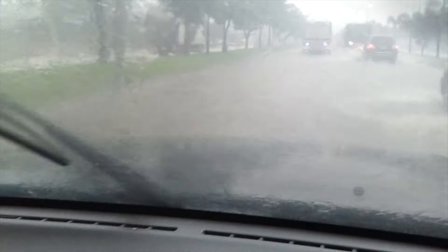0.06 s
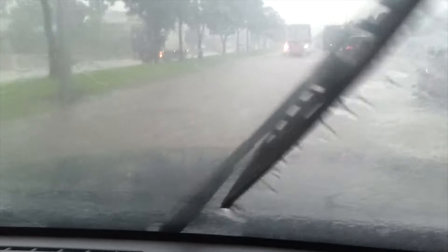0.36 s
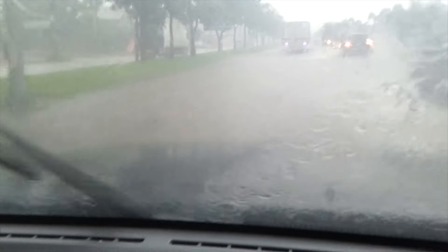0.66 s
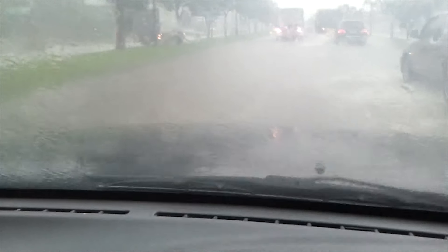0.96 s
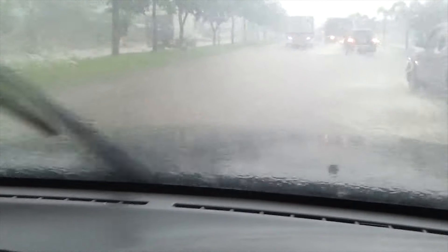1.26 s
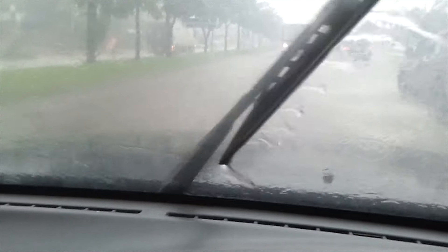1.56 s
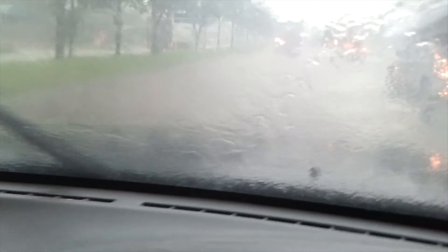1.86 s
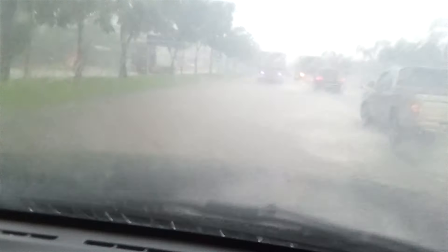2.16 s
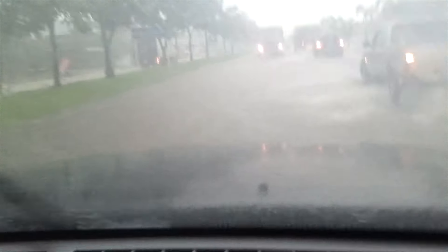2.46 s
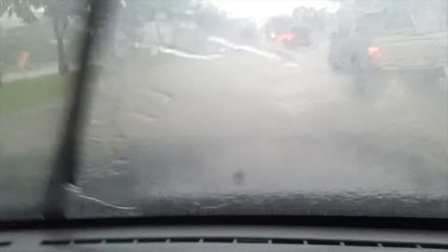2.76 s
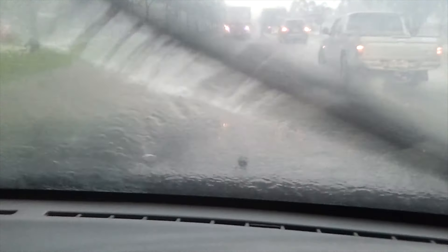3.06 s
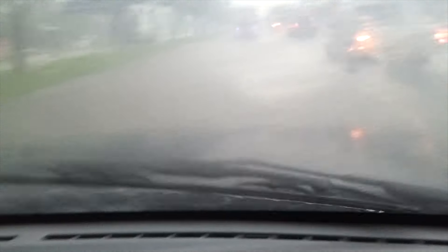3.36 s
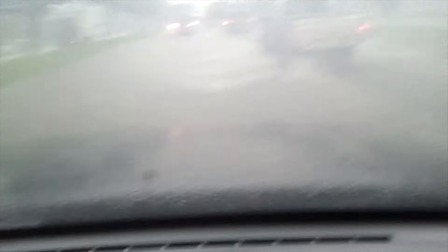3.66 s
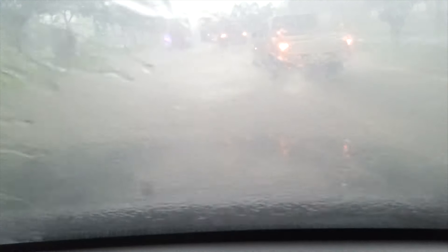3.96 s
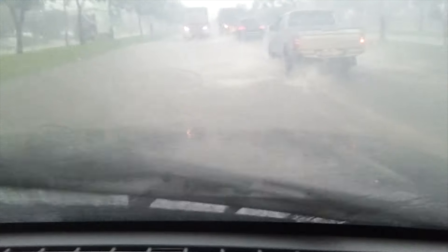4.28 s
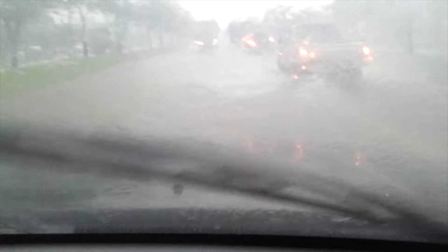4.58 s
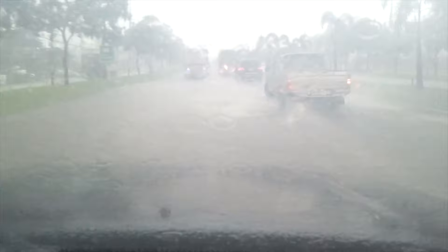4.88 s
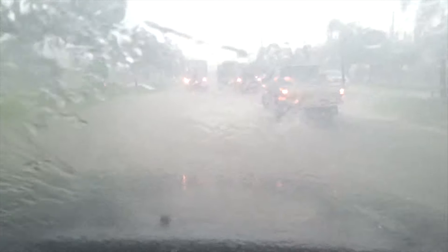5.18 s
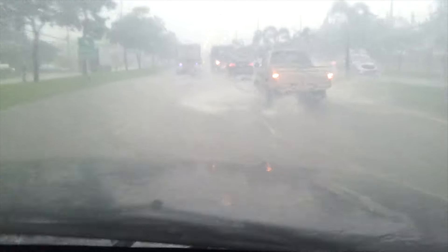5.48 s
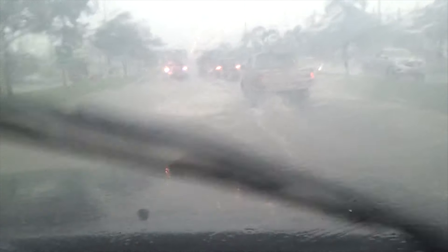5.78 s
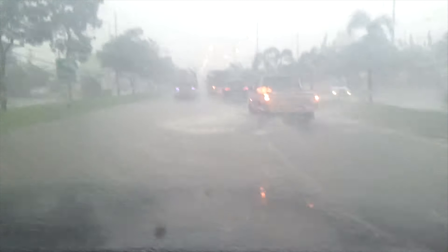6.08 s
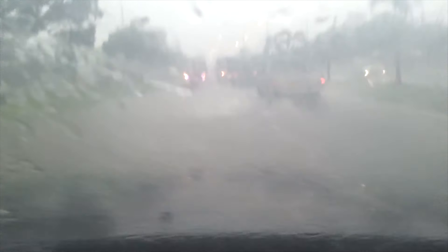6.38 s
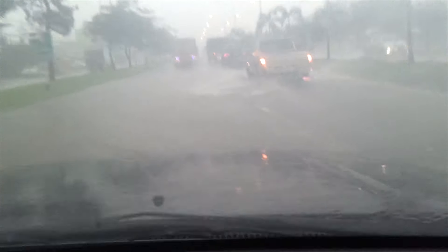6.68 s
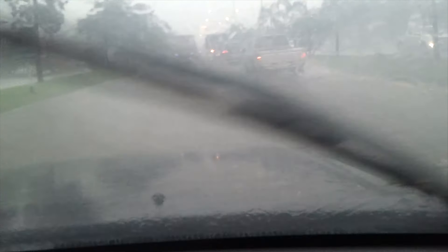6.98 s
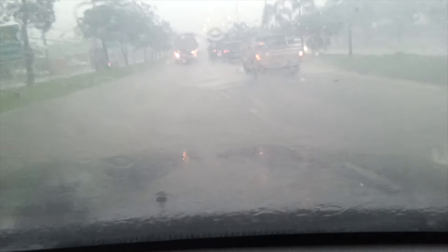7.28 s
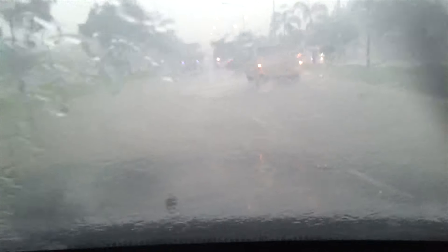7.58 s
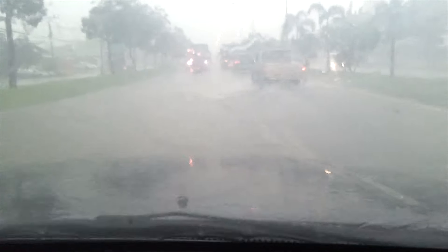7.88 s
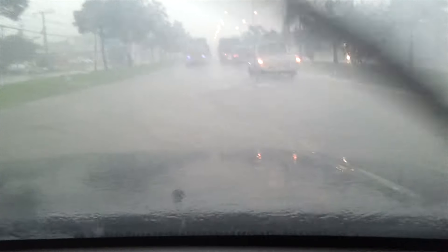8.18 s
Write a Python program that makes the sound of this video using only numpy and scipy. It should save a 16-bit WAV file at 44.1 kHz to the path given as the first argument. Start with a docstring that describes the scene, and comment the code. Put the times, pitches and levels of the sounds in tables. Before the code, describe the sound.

Heavy rain drums on a car roof and ticks on the windscreen, heard from inside the cabin. A deep, steady engine boom and road rumble run underneath, with dull bumps and soft, regular wiper thuds. Water breaks on the glass twice, then halfway through the tyres spray and splash through a puddle. The boom slightly overloads the microphone.

```python
"""Heavy rain on a slowly driven car, heard in the cabin. From the start the engine booms over the road
rumble, drops patter on the roof and tick on the windscreen, and the tyres throw water. From 0.7 s come
dull thumps and bumps; from 1.3 s the wipers thud at the end of each sweep. Water breaks on the glass
near 2 s and 3 s; from 4 s the tyres spray and splash through a puddle. Throughout, crests of the boom
overload the microphone and briefly choke the rain."""
import sys
import numpy as np
from scipy import signal
from scipy.fft import rfft, irfft
from scipy.io import wavfile
from scipy.ndimage import uniform_filter1d

SR = 44100
rng = np.random.default_rng(int(sys.argv[2]) if len(sys.argv) > 2 else 0)


def generate_wav(signal):
    """Clip the signal to [-1, 1] and save it as 16-bit WAV at the path in sys.argv[1]."""
    frames = np.transpose(np.atleast_2d(signal))
    scaled = np.clip(frames, -1, 1) * 32767
    pcm = np.round(scaled).astype(np.int16)
    wavfile.write(sys.argv[1], SR, pcm)


N = 372204
TIME = np.arange(N) / SR


def undb(db):
    """Decibels to gain."""
    return 10 ** (np.asarray(db) / 20)


def unit(x):
    """Scale to rms 1."""
    return x / np.sqrt(np.mean(x ** 2))


def curves(table):
    """Table columns, interpolated linearly in time."""
    times, *columns = np.transpose(table)
    return [np.interp(TIME, times, column) for column in columns]


def colour(x, points, size=8192):
    """Minimum-phase filter through (frequency [Hz], gain [dB]) points."""
    hz, db = np.transpose(points)
    bins_hz = np.maximum(np.arange(size // 2 + 1) * SR / size, 1)
    gain = undb(np.interp(np.log(bins_hz), np.log(hz), db))
    cepstrum = irfft(np.log(gain))
    cepstrum[1:size // 2] *= 2
    cepstrum[size // 2 + 1:] = 0
    impulse_response = irfft(np.exp(rfft(cepstrum)))
    return signal.fftconvolve(x, impulse_response)[:N]


def walk(rate_hz):
    """Random steps, smoothed twice; rms 1."""
    hold = int(SR / rate_hz)
    steps = rng.standard_normal(N)[np.arange(N) // hold]
    return unit(uniform_filter1d(uniform_filter1d(steps, hold), hold))


def pulse(centre_s, half_s):
    """Gaussian envelope, 1/e at half_s from the centre."""
    return np.exp(-((TIME - centre_s) / half_s) ** 2)


def decays(table, t60_s):
    """Envelope that jumps at each (time [s], level [dB]) and dies away."""
    kicks = np.zeros(N)
    for s, db in table:
        kicks[int(s * SR)] += undb(db)
    return signal.lfilter([1], [1, -np.exp(-np.log(1000) / (t60_s * SR))], kicks)


def shower(per_s, spread_db, cap_db=np.inf):
    """Randomly timed impacts, levels exponentially distributed in dB."""
    size_db = np.minimum(spread_db * rng.exponential(size=N), cap_db)
    return (rng.random(N) < per_s / SR) * undb(size_db) * rng.choice([-1, 1], N)


def splash(hits, t60_s, spray_db):
    """Each impact bursts into fast-decaying droplets."""
    pole = undb(-60 / (t60_s * SR)) ** 2
    energy = signal.lfilter([1 - pole], [1, -pole], hits ** 2)
    return hits + undb(spray_db) * np.sqrt(energy) * rng.standard_normal(N)


# (time [s], firing rate [Hz])
FIRING_RATE = [(0, 34.34), (0.8, 34.88), (1.7, 35.23), (2.6, 34.99), (3.4, 34.51), (4.3, 34.3), (5, 33.79),
               (6.2, 33.68), (7, 34.15), (7.7, 33.78), (8.44, 34.27)]
# (time [s], level [dB])
BOOM_LEVEL = [(0, -4), (.33, -4.5), (.8, -3.5), (1.13, -4), (1.3, -1.5), (1.6, -5.5), (2, -4.5), (2.25, -7),
              (2.52, -3.5), (2.98, -4.5), (3.2, -5.5), (3.65, -3.5), (3.87, -4.5), (4.45, -3), (4.68, -5),
              (4.92, -4.5), (5.1, -3.5), (5.33, -4), (5.52, -2.5), (5.72, -2.5), (6.05, -4.5), (6.55, -4.5),
              (6.7, -1.3), (7.15, -4), (7.45, -6), (7.9, -5.5), (8.1, -2.5), (8.44, -3.5)]
# (multiple of firing rate, level off resonance [dB re boom])
OVERTONES = [(2, -28), (3, -30.5), (4, -38)]


def engine(gain_db, waver, mode_hz, mode_width_hz, mode_db):
    """Firing drives the cabin air: a near sine whose weak overtones swell near the lengthwise mode."""
    firing_hz, = curves(FIRING_RATE)
    boom_db, = curves(BOOM_LEVEL)
    phase = 2 * np.pi * np.cumsum(firing_hz) / SR
    tone = np.sin(phase)
    for multiple, db in OVERTONES:
        detuning = 2 * (multiple * firing_hz - mode_hz) / mode_width_hz
        lift = 1 + undb(mode_db) / (1 + detuning ** 2)
        tone -= undb(db) * lift * (1 + waver * walk(4.2)) * np.cos(multiple * phase)
    return tone * undb(boom_db + gain_db - 0.13 * walk(7.2))


# (time [s], relative level [dB])
ROAD_ROUGHNESS = [(0, -23.5), (1.3, -24.5), (3.0, -24.5), (4.1, -22), (4.7, -21.5), (5.2, -22), (5.8, -23),
                  (6.5, -21), (7.3, -23.5), (8.2, -21.5)]
# (frequency [Hz], gain [dB])
RUMBLE_SPECTRUM = [(30, -3.5), (50, -2.5), (62, 0.5), (86, -1), (100, -4.5), (118, -4.5), (132, 0),
                   (150, -6.5), (200, -6.5), (300, -15), (450, -27), (3000, -89.5)]
# (frequency [Hz], gain [dB])
SHAKE_SPECTRUM = [(4, -23.5), (9, -7), (12, -4.5), (18, -2.5), (24, 3.5), (31, -9), (45, -6), (62, -21.5),
                  (86, -16.5), (105, -29), (500, -100)]


def road(rumble_db, shake_db, shake_db_per_db):
    """Tyres rumble through the floor; the body shakes on its springs, more on rough road."""
    rough_db, = curves(ROAD_ROUGHNESS)
    mean_db = np.mean(rough_db)
    body_db = mean_db + shake_db + shake_db_per_db * (rough_db - mean_db)
    rumble = unit(colour(rng.standard_normal(N), RUMBLE_SPECTRUM))
    shake = unit(colour(rng.standard_normal(N), SHAKE_SPECTRUM, size=32768))
    return undb(rough_db + rumble_db) * rumble + undb(body_db) * shake


# (frequency [Hz], bandwidth [Hz], gain [dB])
PANEL_MODES = [(391, 32, -4.5), (501, 66, -3.5), (870, 68, -14), (1010, 230, -15), (1405, 91, -5.5),
               (2226, 100, -7)]


def panels(x):
    """Trim and body panels add short, broad rings."""
    return x + sum(undb(db) * signal.lfilter(*signal.iirpeak(hz, hz / width_hz, fs=SR), x)
                   for hz, width_hz, db in PANEL_MODES)


# (time [s], relative roof level [dB], relative glass level [dB])
RAIN_LEVELS = [(0, -28.5, -29.5), (.13, -28.8, -29.5), (.3, -26.5, -29), (.37, -31.5, -29.5),
               (.5, -28, -30.5), (.78, -29, -30), (1.13, -29, -29.5), (1.27, -30.5, -29.5),
               (1.55, -28.5, -28), (1.82, -31.5, -31), (1.98, -27, -28), (2.19, -28.5, -30),
               (2.6, -26.5, -29.5), (2.9, -26.5, -29.5), (3.15, -26.5, -31), (3.5, -28, -28.5),
               (3.8, -26, -31), (4.55, -25.5, -28.5), (5.0, -27.5, -32.5), (5.9, -28.5, -33),
               (6.45, -30, -36), (6.85, -29.8, -35.5), (7.28, -28.5, -34.5), (7.6, -29.5, -35),
               (8.44, -27.5, -34)]
# (time [s], level [dB])
ROOF_SLAPS = [(1.55, -34), (1.644, -27), (2.829, -25.5), (2.958, -29), (5.149, -28), (5.86, -27),
              (6.83, -27)]
# (frequency [Hz], gain [dB])
ROOF_RESPONSE = [(400, -13.5), (900, -6), (1200, -6), (1500, -1), (1900, 0), (2400, 0), (2900, -4.5),
                 (3500, -13), (4600, -11), (5600, -17), (6700, -29), (12000, -30)]


def roof(gain_db, heavy_db):
    """Dense drops drum on lined steel; heavier ones spatter among them, a few with a wet slap."""
    roof_db, _ = curves(RAIN_LEVELS)
    fine = splash(shower(per_s=3500, spread_db=1.5, cap_db=10), t60_s=0.013, spray_db=6.5)
    heavy = splash(shower(per_s=45, spread_db=2, cap_db=4), t60_s=0.02, spray_db=6)
    slaps = decays(ROOF_SLAPS, t60_s=0.075) * rng.standard_normal(N)
    hits = unit(fine) + undb(heavy_db) * unit(heavy)
    patter = unit(panels(colour(hits, ROOF_RESPONSE))) * undb(roof_db + gain_db + 0.5 * walk(25))
    return patter + unit(panels(colour(slaps, ROOF_RESPONSE))) * np.std(slaps)


# (frequency [Hz], gain [dB])
GLASS_RESPONSE = [(600, -11), (2000, -7.5), (3100, -1.5), (4500, -12), (6700, -16), (7600, -11),
                  (8700, -6.5), (10000, -6), (11400, -3), (12600, -8), (14500, -19), (16000, -60)]
# (frequency [Hz], gain [dB])
TICK_SPECTRUM = [(500, -30), (2000, -22), (4500, -22), (6700, -16), (8000, -17), (9200, -1.5), (11000, 4),
                 (12400, -2), (14000, -12), (16000, -36)]


def windscreen(gain_db, ticks_db):
    """Drops sizzle on bare glass; a few dozen a second stand out as crisp ticks."""
    _, glass_db = curves(RAIN_LEVELS)
    hits = splash(shower(per_s=2700, spread_db=2, cap_db=22), t60_s=0.02, spray_db=2.5)
    ticks = shower(per_s=40, spread_db=3, cap_db=6)
    glass = unit(colour(hits, GLASS_RESPONSE)) + undb(ticks_db) * unit(colour(ticks, TICK_SPECTRUM))
    return glass * undb(glass_db + gain_db + 0.58 * walk(25.16))


# (frequency [Hz], gain [dB])
WASH_SPECTRUM = [(150, -15.5), (330, 3.5), (440, -3.5), (560, -1), (700, -3.5), (950, -5), (1200, -7),
                 (2500, -14), (6000, -58.5)]


def tyre_wash(mean_db, db_per_rain_db):
    """Thrown water rushes against the wheel arches, louder in heavier rain."""
    _, glass_db = curves(RAIN_LEVELS)
    wash_db = mean_db + db_per_rain_db * (glass_db - np.mean(glass_db))
    water = splash(shower(per_s=2000, spread_db=0), t60_s=0.03, spray_db=2)
    return unit(panels(colour(water, WASH_SPECTRUM))) * undb(wash_db + 0.63 * walk(14))


# (time [s], level [dB])
SPRAY_LEVEL = [(0, -43), (0.25, -42.5), (0.85, -44), (1.3, -60), (3.85, -67), (4.05, -37.5), (4.4, -38),
               (4.78, -36), (5.0, -40), (5.35, -38), (5.9, -42), (8.44, -56)]
# (frequency [Hz], gain [dB])
SPRAY_SPECTRUM = [(700, -20), (2400, -4), (3300, 4.5), (4000, 5), (4800, -1.5), (6000, -27), (9000, -12)]


def tyre_spray():
    """Spray from deeper water rattles along the side of the car."""
    level_db, = curves(SPRAY_LEVEL)
    droplets = splash(shower(per_s=2100, spread_db=-2.5), t60_s=0.01, spray_db=6)
    return unit(colour(droplets, SPRAY_SPECTRUM)) * undb(level_db + 1.9 * walk(24.42))


# (time [s], relative level [dB], pitch [Hz])
GLASS_TAPS = [(.100, -29, 3300), (0.139, -27, 3860), (.420, -25, 3700), (.592, -31, 3300),
              (0.802, -40, 3400), (0.838, -24, 3500), (1.083, -27, 3400), (1.782, -22, 3600),
              (2.336, -22, 4200), (2.397, -26, 3500), (2.716, -38, 3900), (3.624, -30, 3700),
              (4.804, -21, 3500), (6.625, -28, 4198), (6.931, -29, 3900), (7.208, -32, 3400),
              (8.205, -32, 3400)]


def taps(gain_db, t60_s, width_hz, samples=2048):
    """Hard drops ring the glass briefly; pitch depends on where they land."""
    out = np.zeros(N)
    fade = np.exp(-np.log(1000) * TIME[:samples] / t60_s)
    for s, db, hz in GLASS_TAPS:
        band = signal.iirpeak(hz, hz / width_hz, fs=SR)
        ring = unit(signal.lfilter(*band, rng.standard_normal(samples)))
        start = int(s * SR)
        out[start:start + samples] += undb(db + gain_db) * ring * fade
    return out


# (time [s], relative level [dB])
FAT_DROPS = [(0.140, -20), (0.7355, -25), (1.6447, -6), (2.035, -18), (2.1185, -16), (2.3403, -20),
             (2.4203, -18), (2.716, -15.5), (2.8268, -11), (2.9605, -17), (3.1066, -17), (3.9776, -20),
             (4.0644, -19.5), (4.452, -21), (4.5264, -13.5), (4.6942, -19), (5.095, -14), (5.701, -22.5),
             (5.8698, -21.5), (6.3517, -23), (6.9127, -25)]


def fat_drops(gain_db, echo_db, spray_t60_s, spray_db):
    """Large drops crack on the glass, echo off the dashboard and scatter."""
    hits = np.zeros(N)
    echo_lags_s = rng.uniform(0.0004, 0.0006, len(FAT_DROPS))
    for (s, db), lag_s in zip(FAT_DROPS, echo_lags_s):
        hits[int(s * SR)] += undb(db)
        hits[int((s + lag_s) * SR)] += undb(db + echo_db)
    spray = undb(spray_db) * decays(FAT_DROPS, spray_t60_s) * rng.standard_normal(N)
    return undb(gain_db) * colour(hits + spray, TICK_SPECTRUM)


# (time [s], level [dB], pitch [Hz])
LOW_THUMPS = [(0.741, -24, 90), (1.261, -22, 114), (2.40, -21, 190), (2.791, -25, 197), (4.185, -17, 111),
              (5.066, -18, 110), (5.15, -24, 179), (5.611, -25, 95), (6.484, -21, 90), (6.931, -25, 192),
              (8.035, -22, 95)]


def thumps(half_s, rumble_db):
    """Short dull thumps in the cabin, from the road or a wiper turning."""
    rumble = undb(rumble_db) * unit(colour(rng.standard_normal(N), RUMBLE_SPECTRUM))
    return sum(undb(db) * pulse(s, half_s) * (np.cos(2 * np.pi * hz * (TIME - s)) + rumble)
               for s, db, hz in LOW_THUMPS)


# (time [s], peak level [dB])
ROAD_BUMPS = [(0.748, -14.5), (1.313, -9), (2.25, -13), (4.185, -8.5), (4.359, -13), (5.058, -5),
              (5.601, -9), (6.109, -6), (6.469, -7.5), (6.651, -8.5), (6.798, -16), (7.531, -11),
              (8.035, -6)]


def bumps(lurch_hz, half_s):
    """Each bump rocks the body and pumps the cabin air."""
    phases_turns = rng.random(len(ROAD_BUMPS))
    return sum(undb(db) * pulse(s, half_s) * np.sin(2 * np.pi * (lurch_hz * (TIME - s) + turn))
               for (s, db), turn in zip(ROAD_BUMPS, phases_turns))


# (time [s], peak level [dB], pitch [Hz])
WIPER_TURNS = [(1.293, -24, 105.5), (2.45, -23.5, 130), (3.625, -23.5, 127.6), (4.785, -24, 126.3),
               (5.96, -28, 133.1), (7.128, -26, 131), (8.295, -29, 131.8)]


def wipers(half_s, slack_rad):
    """Rubber blades flop over with a soft, loose thud."""
    wobble_rad = slack_rad * walk(40)
    return sum(undb(db) * pulse(s, half_s) * np.sin(2 * np.pi * hz * TIME + wobble_rad)
               for s, db, hz in WIPER_TURNS)


# (time [s], half length [s], relative level [dB], pitch [Hz])
GLASS_SLOSHES = [(2.013, 0.0052, -23, 1800), (2.045, 0.038, -29, 2230), (2.97, .14, -34, 2050),
                 (3.27, 0.11, -34, 1900)]


def sloshes(width_hz, gain_db):
    """A sheet of water breaks on the glass into droplets ringing near one pitch."""
    out = np.zeros(N)
    droplets = splash(shower(per_s=1500, spread_db=4, cap_db=15), t60_s=0.012, spray_db=6)
    for s, half_s, db, hz in GLASS_SLOSHES:
        band = signal.iirpeak(hz, hz / width_hz, fs=SR)
        ring = unit(signal.lfilter(*band, signal.lfilter(*band, droplets)))
        out += undb(db + gain_db) * pulse(s, half_s) * ring
    return out


# (time [s], level [dB])
PUDDLE_SLAPS = [(4.388, -16), (4.405, -15), (4.458, -20.5), (4.512, -21), (4.524, -20), (4.536, -24),
                (4.571, -27)]
# (frequency [Hz], gain [dB])
ARCH_RESPONSE = [(400, -22), (1000, -14), (1400, 2), (1750, 4), (2100, -1), (3000, -6), (4500, -22),
                 (7000, -42)]


def puddle(attack_s, t60_s):
    """Puddle water slaps the hollow wheel arch."""
    envelope = uniform_filter1d(decays(PUDDLE_SLAPS, t60_s), int(attack_s * SR))
    return envelope * unit(colour(rng.standard_normal(N), ARCH_RESPONSE))


def scene():
    """Mono cabin mix; roof and glass share the same quick flurries."""
    flurry_db = 0.5 * walk(14)
    water = roof(gain_db=flurry_db - 3.5, heavy_db=-8.5)
    water += windscreen(gain_db=flurry_db - 2, ticks_db=-12.5)
    water += tyre_wash(mean_db=-34.5, db_per_rain_db=0.5)
    water += fat_drops(gain_db=18.5, echo_db=-2, spray_t60_s=0.019, spray_db=-22)
    water += taps(gain_db=-2.5, t60_s=0.029, width_hz=2000)
    water += puddle(attack_s=0.005, t60_s=0.035) + tyre_spray()
    water += sloshes(width_hz=900, gain_db=-4)
    car = engine(gain_db=0.09, waver=0.31, mode_hz=66.4, mode_width_hz=3.35, mode_db=8.5)
    car += road(rumble_db=-4, shake_db=3.5, shake_db_per_db=3)
    car += bumps(lurch_hz=22, half_s=0.041)
    car += thumps(half_s=0.013, rumble_db=-8)
    car += wipers(half_s=0.061, slack_rad=0.83)
    return (water + car)[None]


def record(dry):
    """Microphone overload nearly flattens boom crests and the rain riding on them; then a low-pass."""
    drive_db, ceiling, knee, leak, cutoff_hz = 0.1852, 0.695, 27, 0.06, 14600
    driven = undb(drive_db) * dry
    clipped = driven / (1 + np.abs(driven / ceiling) ** knee) ** (1 / knee)
    heard = (1 - leak) * clipped + leak * driven
    lowpass = signal.ellip(10, 0.2, 80, cutoff_hz, fs=SR, output="sos")
    return signal.sosfilt(lowpass, heard)


dry = scene()
out = record(dry)
generate_wav(out)
```